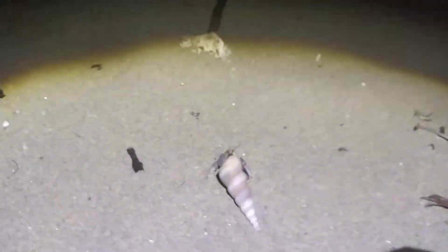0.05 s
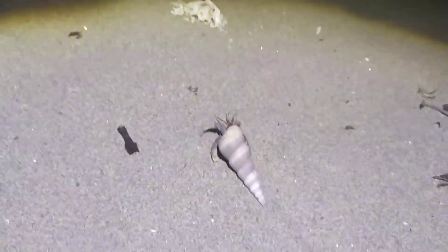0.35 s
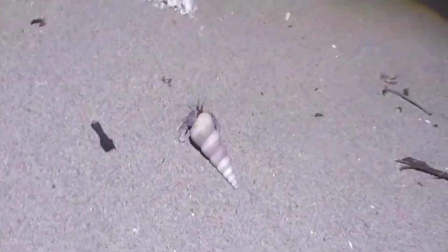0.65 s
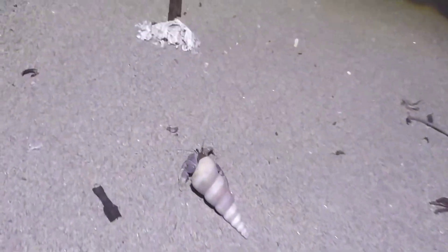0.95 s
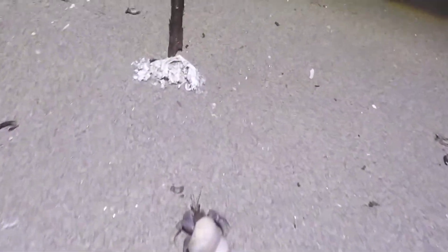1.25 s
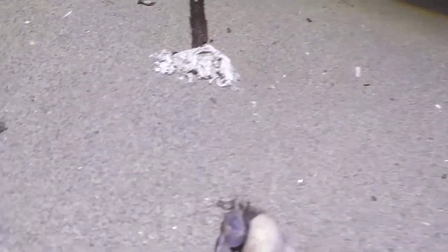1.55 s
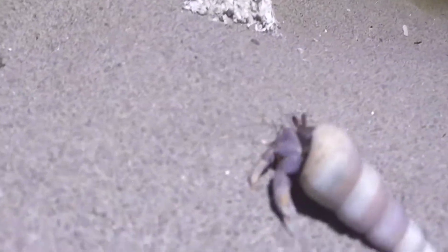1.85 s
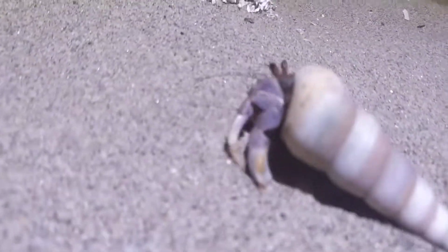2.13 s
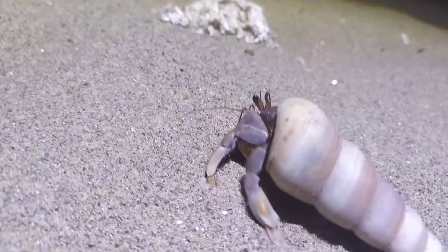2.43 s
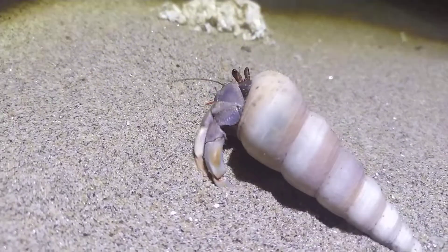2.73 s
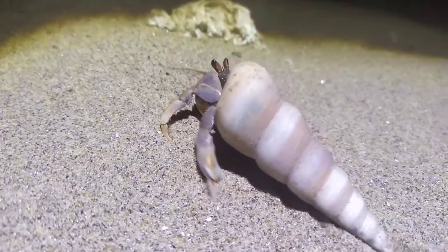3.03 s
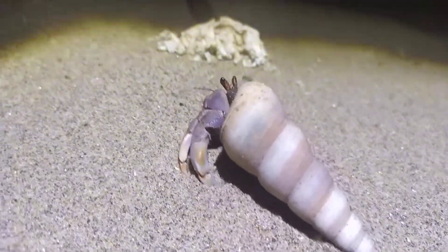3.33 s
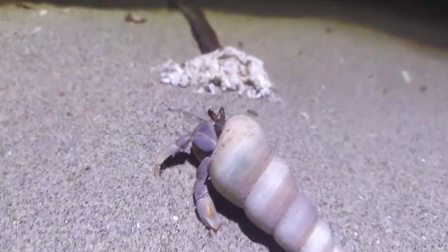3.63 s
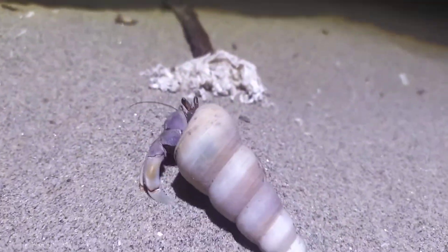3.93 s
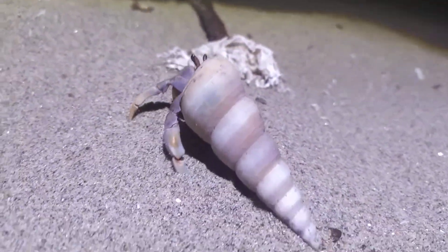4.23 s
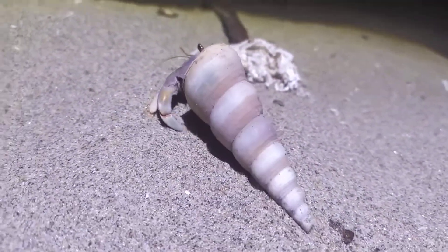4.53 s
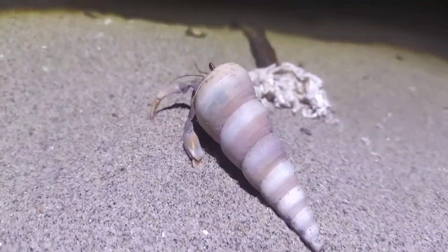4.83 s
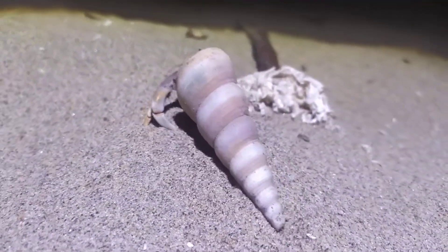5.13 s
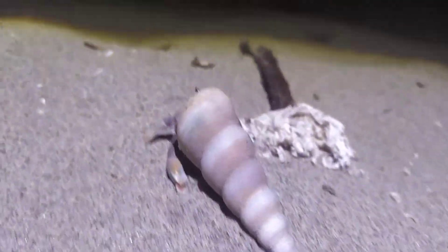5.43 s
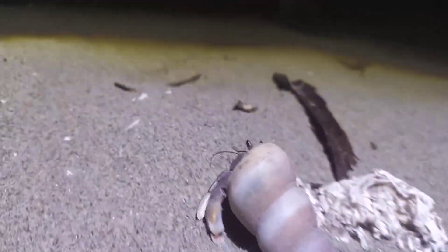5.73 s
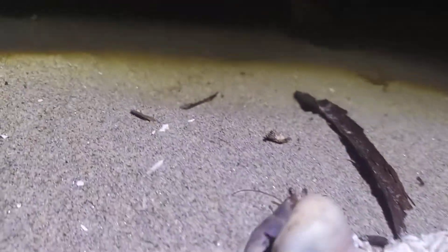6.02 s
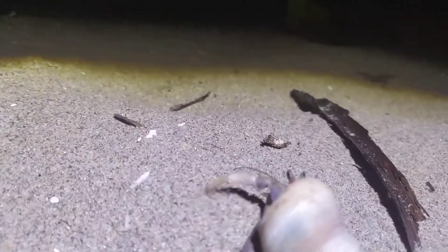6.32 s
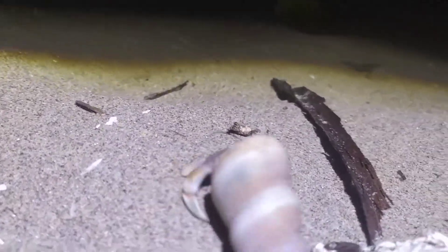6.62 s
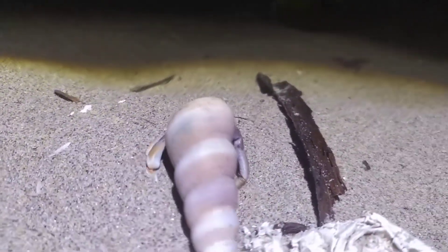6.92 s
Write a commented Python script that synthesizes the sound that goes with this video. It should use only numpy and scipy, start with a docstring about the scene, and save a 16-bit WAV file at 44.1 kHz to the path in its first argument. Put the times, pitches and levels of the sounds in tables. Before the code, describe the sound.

On a sandy beach at night, a light wind rumbles, flutters and thumps against a microphone held near the ground. Distant insects form a steady high hiss over a faint low wash. Sand and clothing rustle softly for the first two seconds, with a few tiny ticks. Later come faint thin whistles and a fine high rasp, and the wind eases near the end.

```python
"""A sandy beach at night, heard from close to the ground while a hermit crab walks by.
Far insects merge into a high steady hiss above the low wash of the distance. Sand and clothing rustle
by stick-slip friction at first; later come a fine high rasp and thin, arching whistles, with a few
ticks along the way. Loudest is a light wind, whose turbulence rumbles, flutters and thumps as it
tumbles over the two microphone ports."""
import sys
import numpy as np
from scipy import signal
from scipy.fft import rfft, irfft, next_fast_len
from scipy.io import wavfile
from scipy.ndimage import uniform_filter1d

SR = 44100
rng = np.random.default_rng(int(sys.argv[2]) if len(sys.argv) > 2 else 0)


def digitize_waveform(pressure):
    """Quantize a signal to 16-bit integers and store it at the path in sys.argv[1].

    Rows of a 2-D input are taken as channels; values are limited to [-1, 1].
    """
    field = np.atleast_2d(pressure).T
    bounded = np.clip(field, -1, 1)
    quanta = np.round(bounded * 32767).astype(np.int16)
    wavfile.write(sys.argv[1], SR, quanta)


N = 311787
T = np.arange(N) / SR
FFT_SIZE = next_fast_len(N)
HZ = np.maximum(np.arange(FFT_SIZE // 2 + 1) * SR / FFT_SIZE, 1)
PORT_LAG_S = 19 / SR   # the left port hears this much later than the right


def from_db(db):
    """Decibels to amplitude gain."""
    return 10 ** (np.asarray(db) / 20)


def unit_rms(x):
    """Normalisation to an rms of 1."""
    return x / np.sqrt(np.mean(x ** 2) + 1e-20)


def time_curves(rows):
    """Linear interpolation of each column at every sample."""
    times_s, *columns = np.transpose(rows)
    return np.array([np.interp(T, times_s, column) for column in columns])


def spectral_gain(rows):
    """Interpolation of each dB column over log frequency, as a gain."""
    hz, *columns = np.transpose(rows)
    return from_db([np.interp(np.log(HZ), np.log(hz), column) for column in columns])


def filtered(x, gain):
    """Filtering by multiplication in the frequency domain."""
    return irfft(rfft(x, FFT_SIZE) * gain, FFT_SIZE)[..., :N]


def bandpass(x, low_hz, high_hz):
    """Butterworth band-pass."""
    return signal.sosfilt(signal.butter(2, [low_hz, high_hz], "band", fs=SR, output="sos"), x + 1e-18)


def drift(rate_hz):
    """Random modulation: noise of rms 1, low-passed near `rate_hz`."""
    return unit_rms(filtered(rng.standard_normal(N), np.exp(-.5 * (HZ / rate_hz) ** 2)))


def swell(peak_s, length_s, release_ratio=1):
    """A Gaussian of power, `length_s` wide at half height; its fall lasts `release_ratio` rises."""
    attack_s = length_s / (1 + release_ratio)
    side_s = np.where(T < peak_s, attack_s, attack_s * release_ratio)
    return .5 ** np.minimum(((T - peak_s) / side_s) ** 2, 100)


def port_noise(gain, coherence, lag_s=0):
    """Partial coherence: the two ports share part of a coloured noise, the left one `lag_s` later."""
    left, independent = rfft(rng.standard_normal((2, FFT_SIZE)))
    shared = coherence * left * np.exp(2j * np.pi * HZ * lag_s)
    right = shared + np.sqrt(1 - coherence ** 2) * independent
    return irfft(np.array([left, right]) * gain, FFT_SIZE)[:, :N]


# Spectral density of the distant wash and air: frequency_hz, left_db_per_hz, right_db_per_hz
WASH_SPECTRUM = [(30, -82, -82), (58, -70, -70), (170, -72, -73), (260, -77, -78), (430, -90, -91),
                 (750, -92.5, -94.5), (1100, -99, -99.5), (1400, -101.5, -104), (2000, -98.3, -105.3),
                 (2900, -99, -107), (4100, -106, -109), (5400, -104, -111), (9300, -99, -111),
                 (11400, -112, -112), (15000, -123, -123)]
def distant_wash(scatter_hz=1700, heave_db=.6):
    """Scattering: short waves of the gently heaving wash reach the ports less coherent than long ones."""
    coherence = .83 / (1 + (HZ / scatter_hz) ** 2)
    wash = port_noise(spectral_gain(WASH_SPECTRUM) * np.sqrt(SR / 2), coherence, PORT_LAG_S)
    return wash * from_db(heave_db * drift(rate_hz=2.5))


# Bands of insect song: centre_hz, width_hz, left_db, right_db
INSECT_BANDS = [(3173, 190, -76.5, -78.5), (4696, 480, -74, -78.5), (7530, 820, -70, -88),
                (7520, 380, -63, -78), (7380, 780, -59, -76), (7540, 100, -68.5, -88)]
# Slow gain of the whole chorus: time_s, gain_db
CHORUS_GAIN = [(0, 3.5), (1, 4), (1.6, 4), (2.1, 1), (3, 0), (4.6, .5), (5.5, 1.3), (6.3, 0), (7.07, 1)]
def insects(shimmer_db=.9):
    """Incoherent summation: many far callers of each kind merge into one faintly shimmering band."""
    chorus = np.zeros((2, N))
    for centre_hz, width_hz, left_db, right_db in INSECT_BANDS:
        resonance = 1 / (1 + (np.sqrt(2) * (HZ - centre_hz) / width_hz) ** 2)
        song = unit_rms(port_noise(resonance, coherence=.028, lag_s=PORT_LAG_S))
        shimmer = from_db(shimmer_db * drift(rate_hz=9))
        chorus += song * from_db([[left_db], [right_db]]) * shimmer
    return chorus * from_db(time_curves(CHORUS_GAIN))


# Swells of fine high rasp: peak_s, length_s, level_db
RASP_SWELLS = [(3.58, 0.23, -67), (4.09, 0.1, -63.5), (6.2, 1, -70), (6.58, 0.2, -59)]
# Relative spectrum of the rasp: frequency_hz, left_db, right_db
RASP_SPECTRUM = [(5540, -8, -40), (7660, -10, -26), (8200, 9.5, -25), (10370, 5.5, -11), (11500, -10, -18),
                 (12500, -8, -15), (14900, -22, -18)]
def rasp(grain_db=4):
    """Amplitude modulation roughens a hiss on the left into a sizzle that swells fast and fades slowly."""
    hiss = unit_rms(port_noise(spectral_gain(RASP_SPECTRUM), coherence=.32, lag_s=PORT_LAG_S))
    power = sum(from_db(level_db) ** 2 * swell(peak_s, length_s, release_ratio=3.2)
                for peak_s, length_s, level_db in RASP_SWELLS)
    return hiss * np.sqrt(power) * from_db(grain_db * drift(rate_hz=350))


# Arches of thin whistling: start_s, top_s, end_s, top_hz, level_db,
# rise_octaves_per_s, fall_octaves_per_s, turn_s, waver_fraction
WHISTLE_ARCHES = [(3.37, 3.49, 3.55, 12450, -66.5, 2.6, 3.4, .005, .01),
                  (3.33, 3.475, 3.545, 11000, -68, 2.2, 4, .02, .035),
                  (5.15, 5.248, 5.315, 9400, -59.5, 1.7, 2.3, .003, .003),
                  (5.185, 5.28, 5.375, 11200, -67, .3, 4.5, .015, .022),
                  (5.305, 5.31, 5.36, 8500, -57.5, 2, 7, .003, .035)]
def whistles(wander_fraction=.006, break_db=3.5, right_db=-11):
    """Frequency modulation: broken tones rise and fall, and a fast waver adds raspy sidebands to some."""
    tones = np.zeros(N)
    for start_s, top_s, end_s, top_hz, level_db, rise, fall, turn_s, waver in WHISTLE_ARCHES:
        from_top_s = np.hypot(T - top_s, turn_s) - turn_s   # rounds the top of the arch
        pitch_hz = top_hz * 2 ** (-from_top_s * np.where(T < top_s, rise, fall))
        detune = waver * drift(rate_hz=450) + wander_fraction * drift(rate_hz=55)
        phase = 2 * np.pi * np.cumsum(pitch_hz * (1 + detune)) / SR
        dips_db = break_db * np.minimum(drift(rate_hz=55), .5)
        progress = np.clip((T - start_s) / (end_s - start_s), 0, 1)
        envelope = 2 * np.sqrt(progress * (1 - progress))
        tones += envelope * from_db(level_db + dips_db) * np.sin(phase)
    return tones * from_db([[0], [right_db]])


# Small scratches and ticks in the sand: start_s, level_db
SAND_CONTACTS = [(0.758, -49), (1.358, -45.5), (1.583, -43), (3.655, -50), (5.089, -49)]
def sand_ticks(t60_s=.025, right_db=-7):
    """Impulsive excitation: each tiny contact gives a bright burst of noise that decays exponentially."""
    impulses = np.zeros(N)
    for start_s, level_db in SAND_CONTACTS:
        impulses[round(start_s * SR)] = from_db(level_db)
    decay_per_sample = from_db(-60 / (t60_s * SR))
    envelope = signal.lfilter([1], [1, -decay_per_sample], impulses + 1e-18)
    bursts = envelope * rng.standard_normal((2, N))
    return bandpass(bursts, 3400, 10600) * from_db([[0], [right_db]])


# Strokes of sand and clothing: start_s, length_s, gain_db
RUB_STROKES = [(0, .2, -4), (.22, .24, -7), (.495, .08, -2.5), (.59, .2, -8.5), (.807, .04, 4),
               (.87, .03, .5), (.92, .1, -2.5), (1.02, .13, -.5), (1.152, .018, 1), (1.19, .11, -8.5),
               (1.3, .085, -1.5), (1.343, .017, 2.5), (1.41, .5, -9.5), (1.92, .4, -13.5)]
# Spectral density of the rubbing at unit gain: frequency_hz, left_db_per_hz, right_db_per_hz
RUB_SPECTRUM = [(500, -103, -103), (840, -104, -95), (1560, -92, -95), (3220, -91.5, -98.5),
                (4530, -93.5, -94.5), (5540, -88.5, -96.5), (7400, -92.5, -99), (8300, -84.5, -95),
                (11640, -99, -100), (14400, -108, -108)]
def rustle(attack_s=.016, release_s=.025, grit_db=1.7, catch_db=1, low_cut_hz=300):
    """Stick-slip friction: each stroke bites, holds and lets go, its slips shedding tiny grains."""
    gain = spectral_gain(RUB_SPECTRUM) * np.sqrt(SR / 2) * HZ / np.hypot(HZ, low_cut_hz)
    friction = port_noise(gain, coherence=.069)
    power = np.zeros(N)
    for start_s, length_s, gain_db in RUB_STROKES:
        attack = np.clip((T - start_s) / attack_s, 0, 1)
        release = np.exp(-np.maximum(T - start_s - length_s, 0) / release_s)
        power += from_db(gain_db) ** 2 * attack * release
    roughness_db = grit_db * drift(rate_hz=300) + catch_db * drift(rate_hz=30)
    return friction * np.sqrt(power) * from_db(roughness_db)


def scuff(level_db=-51):
    """Band-limited friction noise: one brief, dull scuff in the thick of the rustle."""
    friction = unit_rms(bandpass(rng.standard_normal((2, N)), 560, 1400))
    return from_db(level_db) * np.sqrt(swell(peak_s=.881, length_s=.008)) * friction


def turbulence(spectrum, even_s, pitch_ratio=1):
    """Turbulent pressure, incoherent between the ports, its power evened out over `even_s`."""
    gain = spectral_gain([(hz * pitch_ratio, db) for hz, db in spectrum])
    pressure = port_noise(gain, coherence=0)
    local_power = uniform_filter1d(pressure ** 2, int(even_s * SR))
    return pressure / np.sqrt(local_power + .0081 * np.mean(pressure ** 2))


# Strength of the breeze at the ports: time_s, left_db, right_db
BREEZE_STRENGTH = [(0.0, -32.5, -43), (0.25, -31.5, -42), (0.6, -35, -38.5), (0.85, -38, -48),
                   (1.25, -47.5, -41.5), (1.5, -34.5, -39), (1.87, -43, -29.5), (2.25, -53, -38),
                   (2.47, -34.5, -43), (2.68, -49, -46), (3.15, -43.5, -44.5), (3.4, -34, -39.5),
                   (4.2, -43, -40), (4.8, -44, -32), (5.35, -45.5, -46), (6.4, -67, -60),
                   (6.65, -59, -40.5), (7.07, -68, -57)]
# Eddies that buffet one port: peak_s, port (0 left, 1 right), rumble_db, flutter_db, length_s
PASSING_EDDIES = [(0.027, 0, -36, -32.5, 0.055), (0.192, 1, -30, -53, 0.079), (0.195, 0, -20, -32.5, 0.013),
                  (0.278, 1, -35, -52, 0.019), (0.286, 0, -24.5, -32, 0.02), (0.37, 0, -31.5, -49, 0.035),
                  (0.403, 1, -32, -58, 0.081), (0.534, 1, -28, -42.5, 0.028), (0.606, 0, -28.5, -58, 0.069),
                  (0.7, 0, -28.5, -36.5, 0.029), (0.805, 1, -32, -50, 0.034), (0.944, 1, -33.5, -62, 0.067),
                  (1.117, 1, -30, -55, 0.029), (1.371, 1, -27, -54, 0.017), (1.577, 1, -26.5, -51, 0.037),
                  (1.62, 0, -27, -61, 0.056), (1.627, 1, -24, -59, 0.028), (1.795, 1, -15, -51, 0.011),
                  (1.85, 1, -27, -50, 0.038), (1.952, 1, -30, -60, 0.016), (2.112, 0, -33, -34.5, 0.015),
                  (2.195, 1, -32.5, -47, 0.068), (2.358, 1, -30.5, -49, 0.028),
                  (3.313, 1, -29, -40.5, 0.033), (3.439, 0, -32, -37, 0.053), (3.509, 1, -31, -43, 0.033),
                  (3.69, 0, -24.5, -35.5, 0.015), (3.838, 1, -28.5, -43.5, 0.056),
                  (3.956, 0, -28.5, -28, 0.014), (4.022, 0, -24, -33.5, 0.019), (4.18, 0, -27, -37, 0.022),
                  (4.24, 1, -28.5, -40, 0.02), (4.299, 1, -26, -43, 0.016), (4.54, 0, -36, -43.5, 0.078),
                  (4.762, 0, -29.5, -43, 0.056), (4.89, 1, -29.5, -48, 0.022),
                  (5.273, 1, -37, -45.5, 0.022)]
# Relative spectrum of the deep rumble: frequency_hz, level_db
RUMBLE_SPECTRUM = [(20, -36), (33, -14), (45, 0.5), (58, 4.5), (95, -5), (150, -16.5), (230, -36),
                   (400, -59), (1000, -77)]
# Relative spectrum of the flutter above it: frequency_hz, level_db
FLUTTER_SPECTRUM = [(90, -17.5), (185, 13), (260, 1.5), (380, -11), (550, -26), (900, -27.5), (2500, -62)]
def wind(trim_db=-1, gust_db=3.5, flutter_ratio_db=-23, flicker_db=3):
    """Turbulence: the breeze rumbles and flutters in random gusts; strong eddies buffet a bit higher."""
    gusts_db = gust_db * np.array([drift(rate_hz=10.5) for _ in range(2)])
    flickers_db = flicker_db * np.array([drift(rate_hz=21) for _ in range(2)])
    breeze_gain = from_db(time_curves(BREEZE_STRENGTH) + trim_db + gusts_db)
    flutter_power = (breeze_gain * from_db(flutter_ratio_db + flickers_db)) ** 2
    buffet_power = np.zeros((2, N))
    for peak_s, port, rumble_db, flutter_db, length_s in PASSING_EDDIES:
        passing = swell(peak_s, length_s)
        buffet_power[round(port)] += passing * from_db(rumble_db) ** 2
        flutter_power[round(port)] += passing * from_db(flutter_db) ** 2
    rumble = breeze_gain * turbulence(RUMBLE_SPECTRUM, even_s=.0206)
    buffets = np.sqrt(buffet_power) * turbulence(RUMBLE_SPECTRUM, even_s=.0166, pitch_ratio=1.136)
    flutter = np.sqrt(flutter_power) * turbulence(FLUTTER_SPECTRUM, even_s=.0132)
    return rumble + buffets + flutter


def lesser_vortices(per_s=14, above_breeze_db=5.5, spread_db=2, centre_hz=78, spread_octaves=.22):
    """Random arrivals: rows of weaker vortices whose strength follows the breeze at their port."""
    breeze_db, rows = time_curves(BREEZE_STRENGTH), []
    for sample in rng.integers(0, N, round(per_s * N / SR)):
        port = rng.integers(2)
        strength, tightness = rng.standard_normal(2)
        level_db = breeze_db[port, sample] + above_breeze_db + spread_db * strength
        rows.append((sample / SR, port, level_db, centre_hz * 2 ** (spread_octaves * tightness)))
    return rows


# Vortices that slap one port: peak_s, port (0 left, 1 right), level_db, centre_hz
STRONG_VORTICES = [(0.027, 0, -21.5, 136), (0.065, 0, -15, 127), (0.123, 0, -21.5, 190),
                   (0.196, 0, -19, 380), (0.199, 0, -11.5, 130), (.272, 0, -15.5, 175),
                   (0.289, 0, -17, 125), (.293, 0, -21.5, 165), (.313, 0, -14, 117), (.318, 0, -20, 125),
                   (0.709, 0, -20.5, 136), (1.763, 1, -23, 113), (2.112, 0, -29, 135),
                   (2.778, 0, -26.5, 168), (3.435, 0, -14, 149), (3.676, 0, -18, 232),
                   (3.782, 0, -23.5, 125), (3.958, 0, -19.5, 120), (3.987, 0, -24, 139),
                   (4.677, 1, -25, 144), (4.738, 0, -25.5, 135)]
def vortex_slaps(trim_db=-4.5, port_hz=410, port_width_hz=340):
    """A vortex passes as a pressure hump between two dips; the port's damped resonance dulls the thump."""
    pressure = np.zeros((2, N))
    for peak_s, port, level_db, centre_hz in list(STRONG_VORTICES) + lesser_vortices():
        near = np.abs(T - peak_s) < .06
        phase_squared = (2 * np.pi * centre_hz * (T[near] - peak_s)) ** 2
        pulse = (1 - phase_squared) / (1 + phase_squared) ** 2
        pressure[round(port), near] += from_db(level_db + trim_db) * pulse
    port_response = port_hz ** 2 / (port_hz ** 2 - HZ ** 2 + 1j * port_width_hz * HZ)
    return filtered(pressure, port_response)


def scene():
    """Superposition in a free field: all sources add without reverberation."""
    return (wind() + vortex_slaps() + distant_wash() + insects()
            + rustle() + scuff() + rasp() + sand_ticks() + whistles())


def record(dry):
    """Band limiting: the deepest rumble and the highest treble are filtered out."""
    low_cut = signal.butter(4, 33, "high", fs=SR, output="sos")
    top_cut = signal.ellip(10, .1, 80, 15100, fs=SR, output="sos")
    return signal.sosfilt(top_cut, signal.sosfilt(low_cut, dry))


dry = scene()
out = record(dry)
digitize_waveform(out)
```